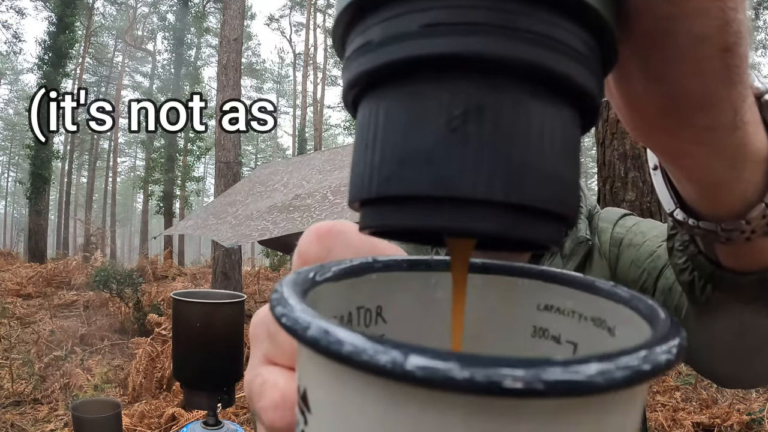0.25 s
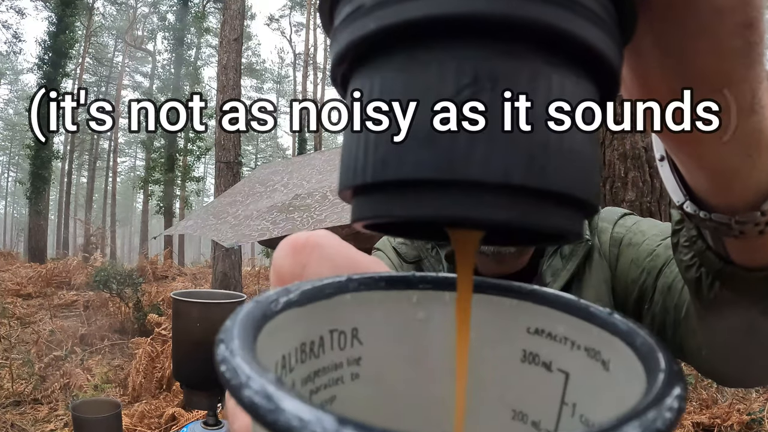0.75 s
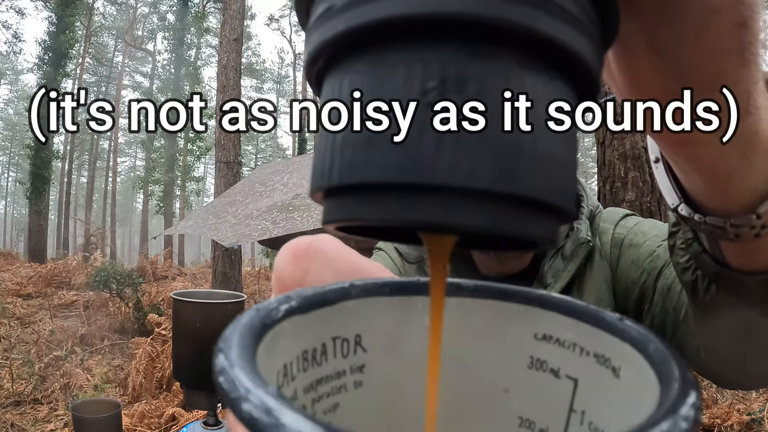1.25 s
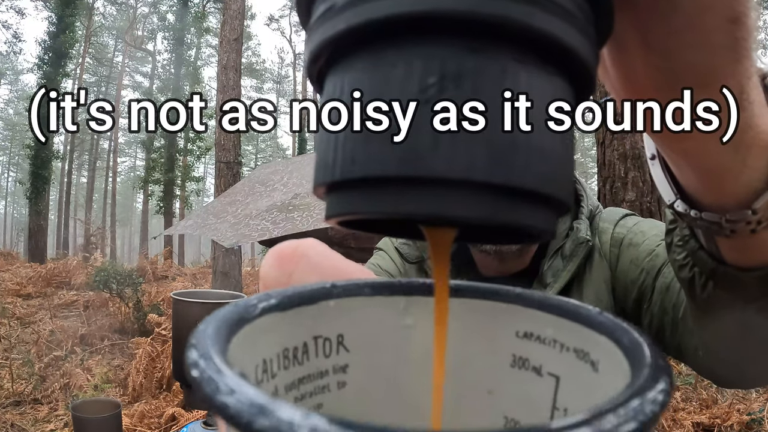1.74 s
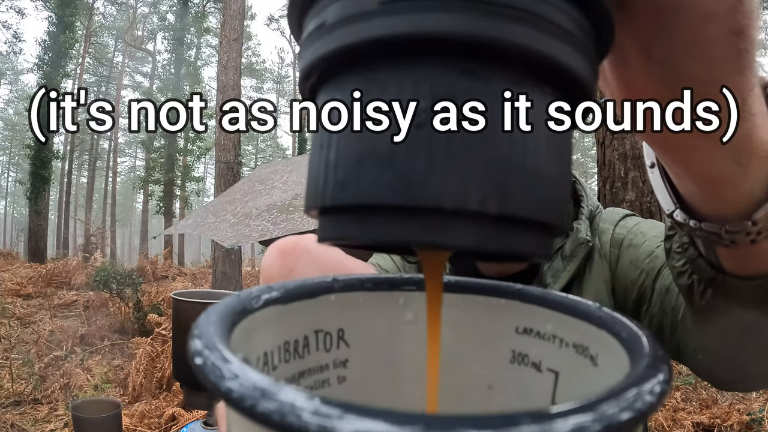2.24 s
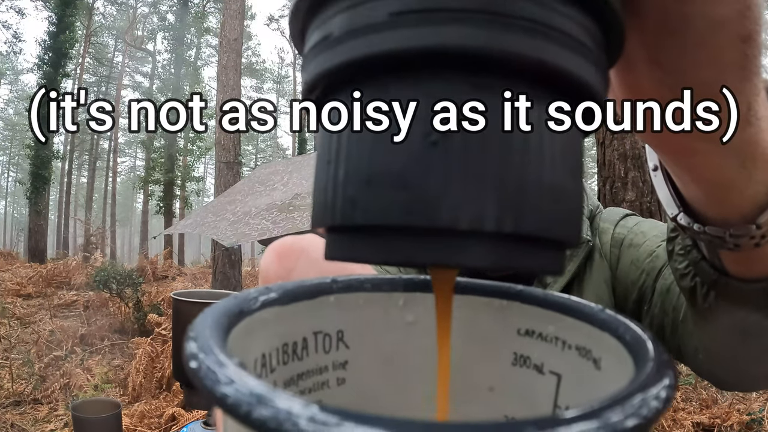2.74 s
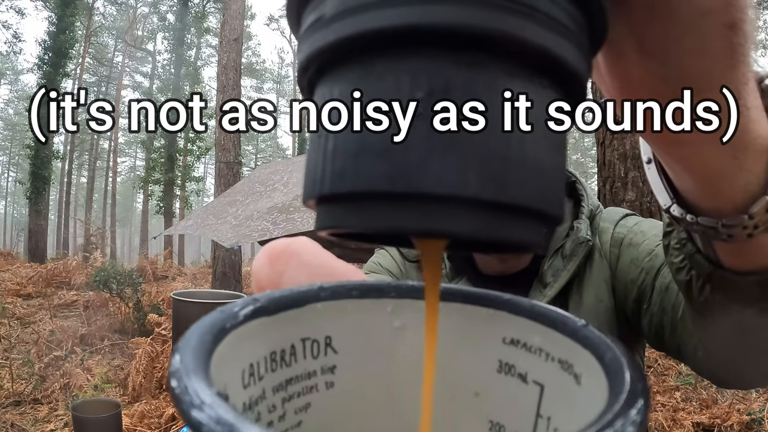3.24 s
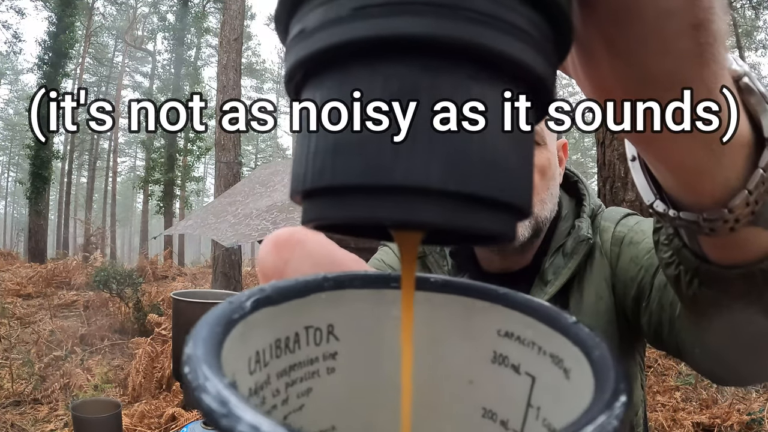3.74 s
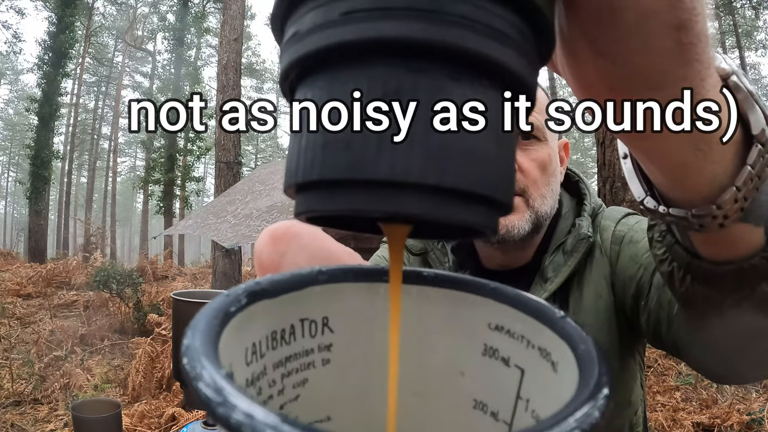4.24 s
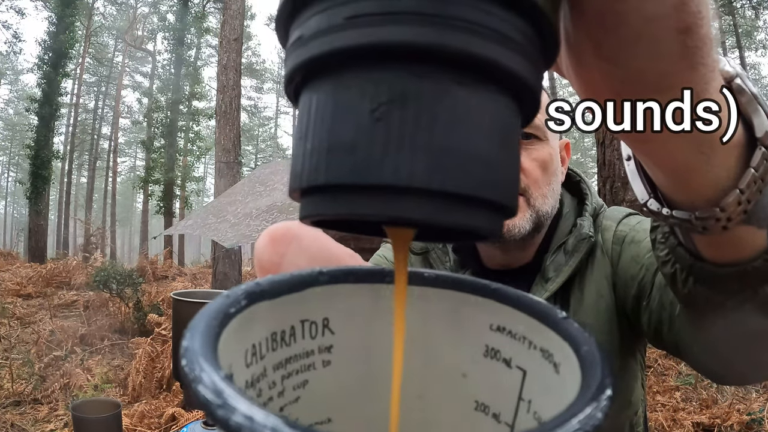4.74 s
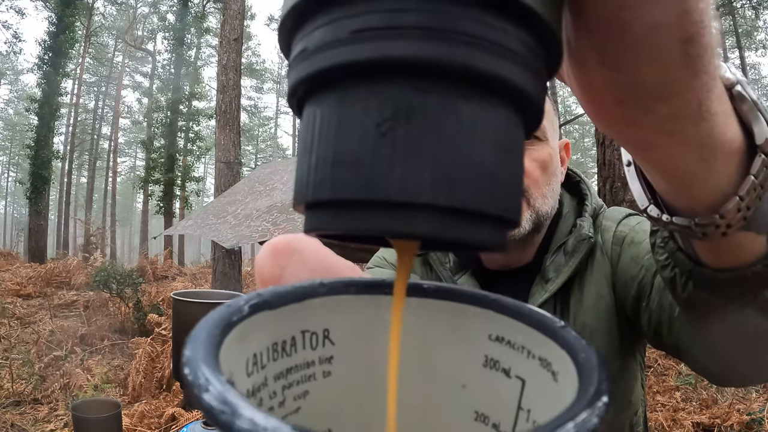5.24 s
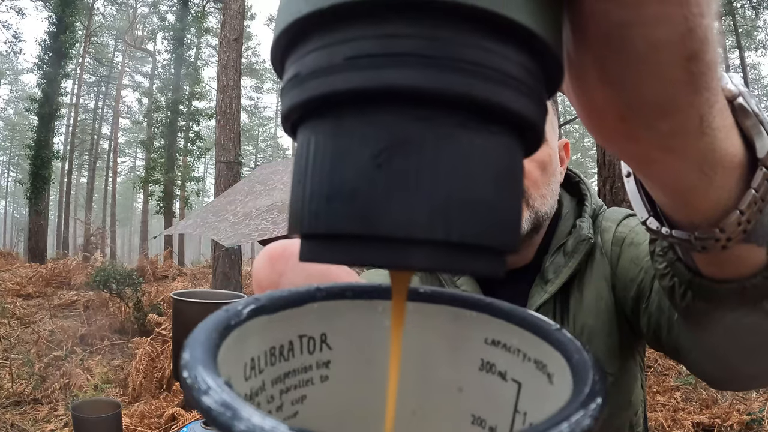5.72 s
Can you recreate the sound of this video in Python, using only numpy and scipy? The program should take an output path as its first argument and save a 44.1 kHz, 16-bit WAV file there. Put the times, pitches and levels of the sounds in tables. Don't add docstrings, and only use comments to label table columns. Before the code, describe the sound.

A small hand-held electric coffee pump buzzes harshly and steadily up close, then cuts out with a brief whirr and ticks, over faint traffic rumble.

```python
import sys
import numpy as np
from scipy import signal
from scipy.fft import rfft, irfft
from scipy.io import wavfile
from scipy.ndimage import uniform_filter1d

SR = 44100
rng = np.random.default_rng(int(sys.argv[2]) if len(sys.argv) > 2 else 0)


def voltage_ratio(level):
    return 10 ** (np.asarray(level, float) / 20)


def file_out(sig):
    cols = np.atleast_2d(sig).T
    lim = np.clip(cols, -1, 1)
    pcm = np.round(lim * 32767).astype(np.int16)
    wavfile.write(sys.argv[1], SR, pcm)


N = 263718
STOP_S = 5.861

# (time [s], speed [turns/s])
CRANK_SPEED = [(0, 69.267), (0.25, 68.688), (0.55, 68.897), (0.8, 69.48), (1.1, 69.033), (1.5, 68.798),
               (1.75, 69.003), (2.05, 68.969), (2.4, 68.876), (2.9, 69.434), (3.25, 68.916), (3.6, 69.246),
               (3.95, 69.114), (4.25, 69.005), (4.7, 69.16), (5.05, 68.721), (5.4, 68.836), (5.86, 68.892)]
# (place of peak [turns], ring [Hz], decay [ms], level [dB], own time scatter [ms])
PRESSURE_BLOWS = [(0.66, 6450, .4, 8.5, .004), (.605, 5940, .45, 3.5, .006), (.605, 8000, 0.388, -4.5, .04),
                  (.61, 9750, 0.49, -12, 0.054), (.605, 12100, 0.29, -18.5, 0.043),
                  (.605, 14500, 0.19, -15, 0.059), (.58, 3510, 0.291, -3, 0.016),
                  (.69, 4080, 0.477, -6, 0.026), (0.681, 4900, 0.794, 3.5, 0.022),
                  (.69, 2750, 0.749, -5.5, 0.021), (.675, 1146, 0.842, 5, 0.038),
                  (.69, 1397, 0.768, 5, 0.043), (.75, 1890, 0.852, 6, 0.046), (0.6, 7400, 0.438, -5, 0.096)]
RETURN_BLOWS = [(1, 782, 0.683, -2, 0.022), (.99, 1148, 0.563, 4, 0.045), (1.04, 1963, 0.699, 2, 0.036),
                (1.02, 4960, 0.67, -1.5, 0.063), (1.09, 3530, .4, -7, 0.013), (1.02, 5900, .3, -4, 0.072),
                (1.13, 6550, 0.497, -1, 0.016), (1.13, 7750, 0.464, -9, 0.07),
                (1.06, 9100, 0.573, -18, .05), (1.13, 12500, .2, -19, .05), (1.15, 4880, 0.786, -9, 0.057),
                (1.176, 2750, 0.685, -8.5, 0.02), (1.145, 844, 0.861, 9.5, 0.025),
                (1.2, 1370, 1.223, -5, 0.052), (1.13, 625, 0.921, -4, 0.017)]
# (frequency [Hz], spread [dB])
BLOW_SPREAD = [(800, .8), (2000, .8), (5000, 1.2), (6500, 1.3), (12000, 3.0)]
# (time [s], share of slack and scatter [0-1])
CRANK_PLAY = [
    (0, .9),
    (2.42, 1.0),
    (2.5, .4),
    (5.86, .45),
]
# (body, shell, valve [Hz]) and their levels [dB]
GRIP_HZ = (1200, 1900, 5000)
GRIP_DB = (-18, -19.5, -20.5)
# (multiple of crank speed, level [dB])
CASING_VOICE = [(8, -11), (9, -12.0), (10, -7.5), (11, -4.5), (12, -1), (13, -9), (14, -8), (15, -6.5),
                (16, -10), (17, -7.5), (18, -7.0), (19, -11), (20, -11.5), (21, -8), (22, -18.5), (23, -30),
                (24, -11), (25, -12.5), (26, -9), (27, -5.5), (28, -7), (29, -11.5), (30, -15.5), (31, -16),
                (34, -21), (36, -21), (38, -18.5), (40, -15.5), (41, -18.5), (42, -26.5)]
# (from [s], to [s])
VOICE_SPAN = (.5, 3.2)
# (centre [Hz], width [Hz], change when full [dB])
PANELS = [(796, 67, -3.5), (958, 52, 6.5), (1050, 57, -4.5), (1380, 130, 3.5), (1740, 29, -12),
          (1880, 140, -7), (1980, 60, 1), (2100, 40, -5), (2620, 34, -4), (2720, 89, -2), (4740, 130, 0.5),
          (5750, 150, -6), (7300, 200, -1), (7600, 220, 6.5)]
# (time [s], share [0-1])
CUP_FILL = [
    (2.6, 0),
    (3.6, 0.23),
    (4.401, 0.8),
    (5.3, 1),
]
# (frequency [Hz], level [dB per Hz])
RATTLE_COLOUR = [(240, -55), (400, -19), (496, -18.5), (824, -8), (961, -3), (1430, -9), (1570, -5.5),
                 (1920, -11.5), (3090, -19.5), (4400, -19), (4830, -13), (5370, -24.5), (6460, -17),
                 (7090, -20.5), (15800, -40)]
# (place [turns], length [turns], level [dB])
RATTLE_PUFFS = [
    (0.582, 0.11, -2.5),
    (1.06, 0.073, -2.5),
]
# (multiple, level [dB], grows from [s], to [s], swing [+-1])
CRANK_HUMS = [
    (31, -33.5, 1.5, 5.0, 1),
    (39, -42, 4.2, 5.0, 1),
    (24, -36, 0.2, 5.0, -1),
]
# (frequency [Hz], level [dB per Hz])
RUNDOWN_LEVEL = [
    (5.86, -35),
    (5.862, -20),
    (5.98, -22),
]
RUNDOWN_COLOUR = [(180, -41), (300, -10), (485, -12), (554, -14), (699, -9), (881, -10), (1020, -2),
                  (1420, -11), (2090, -6.5), (2340, -22), (2860, -14.5), (3160, -24.5), (15800, -44)]
# (pitch at the cut [Hz], glide [Hz/s], level [dB], fade [dB/s])
WHINES = [
    (965, 900, -28, 60),
    (1910, 203, -36, 20),
    (2890, -500, -42, 60),
]
# (time [s], peak [dB], ring [Hz])
CRANK_TICKS = [
    (5.8714, -28, 7400),
    (5.8806, -32, 6670),
    (5.9105, -20, 6750),
    (5.9464, -31, 6250),
    (5.9782, -34, 6790),
]
# (time [s], peak [dB], ring [Hz], decay [ms])
DRIP = (1.664, -18.5, 2950, .9)
# (centre [Hz], width [Hz], depth [dB])
PATH_DIPS = [(2222, 47, 6), (3640, 115, 8), (4500, 290, 1), (5090, 140, 3), (5430, 200, 0), (5840, 41, 4),
             (6940, 120, 6), (7520, 210, 4), (8000, 74, 3.5), (8800, 160, 4), (10130, 370, 5.5),
             (11270, 300, 4.5), (12500, 200, 3.5), (13700, 200, 0)]
# (centre [Hz], width [Hz], lift [dB])
HOLLOWS = [(2340, 100, 1.5), (2857, 55, 4), (3400, 76, 2), (4880, 64, 1), (5630, 110, 2.5),
           (5900, 110, 1.5)]
# (frequency [Hz], level [dB per Hz])
RUMBLE_COLOUR = [(15, -47), (25, -34), (43, -9.5), (65, -0.5), (124, -2), (156, -6), (203, -5.5),
                 (277, -3.5), (379, -12), (500, -13), (650, -16.5), (1100, -120)]
# (centre [Hz], width [Hz], level [dB])
DRONES = [
    (85.8, 5.6, -45.5),
    (206, 3.9, -43.5),
]
# (time [s], pitch [Hz])
ENGINE_PITCH = [
    (0, 62.3),
    (3.0, 62.5),
    (3.35, 61.1),
    (5.98, 59.8),
]
# (peak time [s], level [dB], fade [dB/s])
GUSTS = [(.27, -32, 55), (.87, -34, 100), (1.28, -31.5, 60), (1.93, -35, 20), (2.28, -34, 10),
         (2.93, -34, 80), (3.38, -33, 78), (3.71, -34, 25), (4.51, -29.5, 11), (5.81, -32, 110)]
# (from [s], to [s])
APART_SPANS = [(.95, 1.0), (1.6, 2.24), (2.48, 2.53), (2.77, 2.82), (3.33, 3.5), (3.6, 3.87), (5.24, 5.52),
               (5.88, 5.97)]
# (frequency [Hz], level [dB per Hz])
APART_COLOUR = [(24, -31), (40, 0), (804, -4), (1000, -13), (1170, -56), (1610, -5), (1870, -36),
                (2110, -6), (6460, -2.5), (15000, -29)]


def evened(x):
    return x / np.sqrt(np.mean(x ** 2) + 1e-20)


def read(points, hz):
    f, value = np.transpose(points)
    return np.interp(np.log(hz + 1), np.log(f + 1), value)


def bumps_db(bands):
    hz = np.fft.rfftfreq(N, 1 / SR)
    return sum(db * np.exp(-((hz - f) / width) ** 2) for f, width, db in bands)


def noise(colour, patchy_db, size=1024):
    hz = np.fft.rfftfreq(size, 1 / SR)
    a, b, patches = rng.standard_normal((4 * N // size + 5, len(hz), 3)).T
    patches = uniform_filter1d(patches, size=8, axis=0)
    patches = evened(uniform_filter1d(patches, size=12, axis=1))
    z = (a + 1j * b) * voltage_ratio(read(colour, hz)[:, None] + patchy_db * patches)
    return evened(signal.istft(z, nperseg=size, noverlap=3 * size // 4)[1][:N])


def pump():
    t = np.arange(N) / SR
    turns = np.cumsum(np.interp(t, *np.transpose(CRANK_SPEED))) / SR
    blows = voltage_ratio(-1.3) * (stroke(PRESSURE_BLOWS, turns) + stroke(RETURN_BLOWS, turns))
    no_bass = signal.butter(N=2, Wn=520, btype="high", fs=SR, output="sos")
    blows = signal.sosfiltfilt(no_bass, blows)
    casing = shifted(voiced(blows, turns))
    running = np.clip((STOP_S - t) / 0.0032, 0, 1)
    return casing + running * (rattle(turns) + hums(t, turns))


def stroke(blows, turns):
    slack_ms, valve_snap_ms = 0.033, 0.129
    count = np.arange(-1, int(turns[-1]) + 1)
    slack, snap, force, drift = rng.standard_normal((len(count), 4)).T
    slack = evened(uniform_filter1d(slack, size=2))
    gear = np.pi / 2 * count + np.cumsum(0.064 * drift)
    out = np.zeros(N)
    for place, hz, decay_ms, db, scatter_ms in blows:
        late, size = rng.standard_normal((len(count), 2)).T
        at = np.interp(count + place, turns, np.arange(N) / SR, -1, 99) - softness(hz) * decay_ms / 1000
        live = (at > 0) & (at < STOP_S)
        valve_part = hz > 5500
        play = np.interp(at, *np.transpose(CRANK_PLAY))
        late_ms = play * (slack_ms * slack + scatter_ms * late) + valve_snap_ms * snap * valve_part
        at = at + late_ms / 1000
        if valve_part:
            size = .6 * size + .8 * force
        size = np.minimum(size, 1.2) if valve_part else np.minimum(size, 1.2)
        gear_db = 2.4 * np.cos(gear) * (5500 < hz < 7000)
        gear_db = gear_db + 1.3 * np.cos(2 * gear) * (4500 < hz < 5500)
        held_db = np.interp(hz, GRIP_HZ, GRIP_DB)
        level_db = db + held_db + read(BLOW_SPREAD, hz) * size + gear_db
        index = np.clip(np.round(at * SR), 0, N - 1).astype(int)
        train = np.zeros(N, complex)
        train[index] = live * voltage_ratio(level_db) * np.exp(2j * np.pi * hz * (index / SR - at))
        out += signal.oaconvolve(train, ring(hz, decay_ms))[:N].imag
    return out


def ring(hz, decay_ms):
    t = np.arange(1500) / SR
    u = t * 1000 / max(decay_ms, .05)
    order = softness(hz)
    return (u / order) ** order * np.exp(order - u) * np.exp(2j * np.pi * hz * t)


def softness(hz):
    return 1 + (hz < 4500) + (hz < 1000)


def voiced(blows, turns):
    k, want_db = np.transpose(CASING_VOICE)
    k = np.round(k)
    near = slice(round(VOICE_SPAN[0] * SR), round(VOICE_SPAN[1] * SR), 8)
    unwound = np.exp(-2j * np.pi * np.outer(k, turns[near])) * blows[near]
    parts = np.array_split(unwound, 60, axis=1)
    have = np.sqrt(sum(abs(part.mean(1)) ** 2 for part in parts))
    gain_db = 20 * np.log10(evened(voltage_ratio(want_db)) / evened(have))
    gain_db = np.r_[np.clip(gain_db, -11, 9), 0]
    multiple = np.fft.rfftfreq(N, 1 / SR) / np.mean(np.transpose(CRANK_SPEED)[1])
    gain_db = np.interp(multiple, np.r_[k, k[-1] + 1], gain_db)
    return irfft(rfft(blows) * voltage_ratio(gain_db), N)


def shifted(casing):
    fill = np.clip(np.interp(np.arange(N) / SR, *np.transpose(CUP_FILL)), 0, 1)
    changed = irfft(rfft(casing) * voltage_ratio(bumps_db(PANELS)), N)
    return (1 - fill) * casing + fill * changed


def rattle(turns):
    gate = voltage_ratio(-3.5) * np.ones(N)
    for place, length, db in RATTLE_PUFFS:
        u = ((turns - place) % 1) / length
        turn = np.floor(turns - place).astype(int) + 2
        size = voltage_ratio(3.4 * rng.standard_normal(int(turns[-1]) + 3))[turn]
        gate += voltage_ratio(db) * size * u * np.exp(1 - u)
    return voltage_ratio(-24) * evened(gate) * noise(RATTLE_COLOUR, patchy_db=-0.64, size=512)


def hums(t, turns):
    out = np.zeros(N)
    for multiple, db, start, end, swing in CRANK_HUMS:
        grown = np.interp(t, (start, end), [0, 1])
        out += np.sign(swing) * voltage_ratio(db) * grown * np.sin(2 * np.pi * round(multiple) * turns)
    return out


def rundown():
    t = np.arange(N) / SR
    on = np.clip((t - STOP_S + .004) / 0.0035, 0, 1)
    level = voltage_ratio(np.interp(t, *np.transpose(RUNDOWN_LEVEL)))
    out = on * level * noise(RUNDOWN_COLOUR, patchy_db=1.0, size=512)
    out += on * whine(t)
    for s, db, hz in CRANK_TICKS:
        part = out[round(s * SR):][:1500]
        part += voltage_ratio(db) * ring(hz, decay_ms=0.36).imag[:len(part)]
    return out


def whine(t):
    since = np.maximum(t - STOP_S, 0)
    waver = uniform_filter1d(rng.standard_normal((len(WHINES), 2, N)), size=500, axis=2)
    out = np.zeros(N)
    for (hz, glide, db, fade), (pitch, size) in zip(WHINES, waver):
        turns = np.cumsum(hz + glide * since + 40 * evened(pitch)) / SR
        out += voltage_ratio(db - fade * since + 3.0 * evened(size)) * np.sin(2 * np.pi * turns)
    return out


def dipped(x):
    hz = np.fft.rfftfreq(N, 1 / SR)
    edge_hz = 15760
    loss_db = bumps_db(PATH_DIPS) - bumps_db(HOLLOWS)
    loss_db += 10 * (hz > edge_hz) + 40 * (hz > edge_hz + 110)
    return irfft(rfft(x) * voltage_ratio(-loss_db), N)


def drip():
    s, db, hz, decay_ms = DRIP
    out = np.zeros(N)
    out[round(s * SR):][:1500] = voltage_ratio(db) * ring(hz, decay_ms).imag
    return out


def rumble():
    t = np.arange(N) / SR
    out = voltage_ratio(-30) * noise(RUMBLE_COLOUR, patchy_db=1.5, size=4096)
    out += engine(t)
    for hz, width, db in DRONES:
        r = np.exp(-np.pi * width / SR)
        slow = rng.standard_normal(N) + 1j * rng.standard_normal(N)
        for _ in range(2):
            slow = signal.lfilter([1 - r], [1, -r], slow)
        out += voltage_ratio(db) * evened((slow * np.exp(2j * np.pi * hz * t)).real)
    return out


def engine(t):
    rise = 66
    gusts = [db - np.where(t < s, rise * (s - t), fade * (t - s)) for s, db, fade in GUSTS]
    level_db = np.maximum(np.max(gusts, axis=0), -46)
    turns = np.cumsum(np.interp(t, *np.transpose(ENGINE_PITCH))) / SR
    return np.sqrt(2) * voltage_ratio(level_db) * np.sin(2 * np.pi * turns)


def scene():
    mono = dipped(pump() + rundown()) + rumble() + drip()
    return np.array([mono, mono])


def roll_off(x):
    return signal.sosfilt(signal.butter(12, 15910, fs=SR, output="sos"), x)


def record(dry):
    t = np.arange(N) / SR
    apart = sum((t > a) * (t < b) * 1. for a, b in APART_SPANS)
    apart = uniform_filter1d(apart, size=400)
    side = voltage_ratio(-45) * apart * noise(APART_COLOUR, patchy_db=2.5, size=1024)
    mix = dry + np.array([side, -side])
    return roll_off(mix)


dry = scene()
out = record(dry)
file_out(out)
```